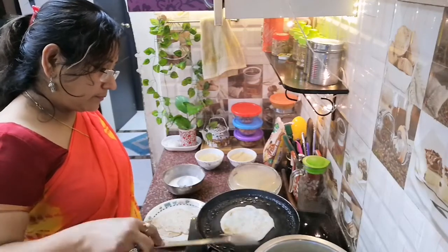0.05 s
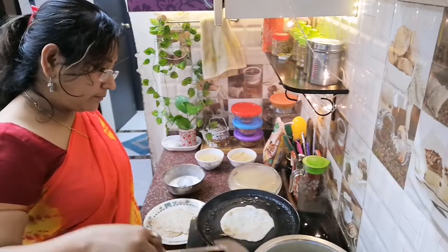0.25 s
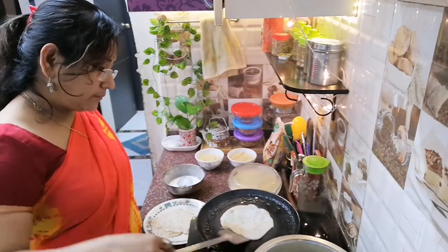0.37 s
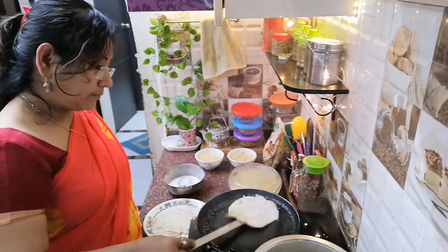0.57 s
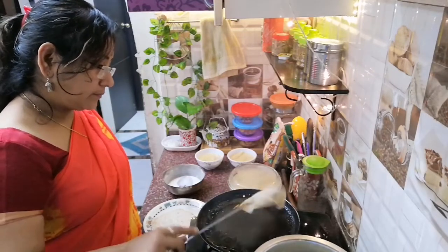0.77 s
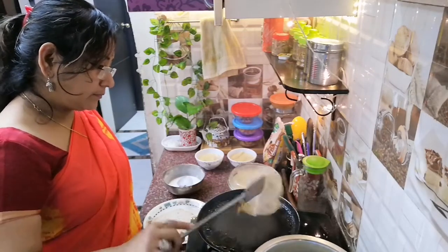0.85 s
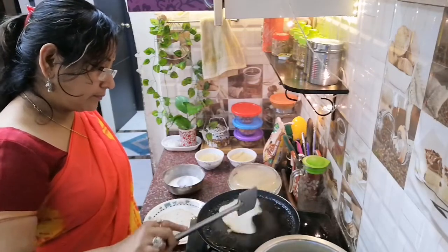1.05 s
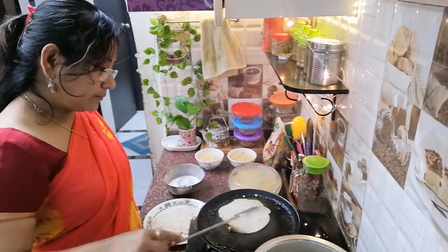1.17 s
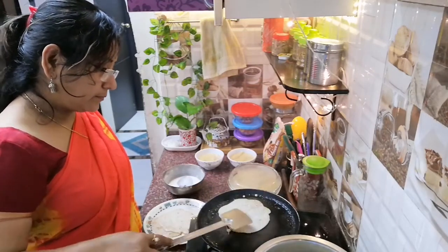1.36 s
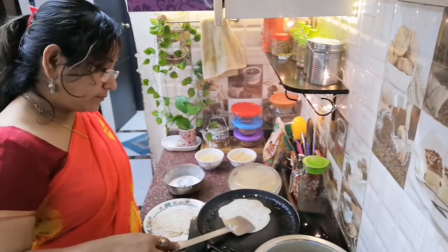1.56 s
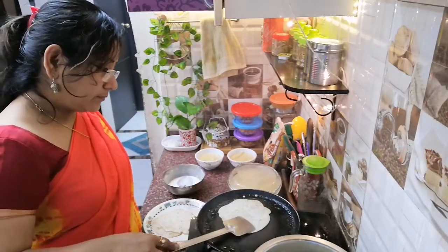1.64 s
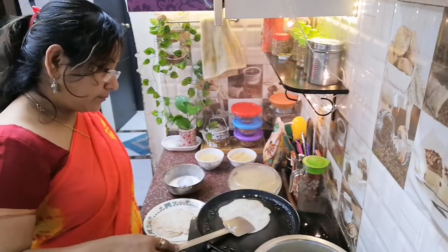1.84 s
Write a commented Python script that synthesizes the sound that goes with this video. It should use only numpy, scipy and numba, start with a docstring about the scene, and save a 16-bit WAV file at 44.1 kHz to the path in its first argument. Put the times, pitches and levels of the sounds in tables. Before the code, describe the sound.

Close stereo sound of a pancake being turned in a small tiled kitchen: ringing spatula knock, squeaky scraping, a short pause, soft wet slap with spitting steam, then pressing hiss and four dull taps over low rumble.

```python
"""Turning a pancake in a pan

A spatula knocks on a pan, exciting its modes, then scrapes and squeals under a small pancake by stick-slip.
The wet side lands as a noisy slap with spits of steam; the blade presses it and pats it four times.
Batter sizzles faintly throughout as random steam pops; filtered noise gives the kitchen's low rumble.
Decaying noise echoes stand for the tiles and the short reverberation of the room."""
import sys
import numpy as np
from scipy import signal
from scipy.fft import rfft, irfft
from scipy.io import wavfile
from numba import njit

SR = 44100
rng = np.random.default_rng(int(sys.argv[2]) if len(sys.argv) > 2 else 0)


def dump_mix(stems):
    """Bounce the given channels to the path in sys.argv[1] as a 16-bit WAV at rate SR."""
    frames = np.atleast_2d(stems).T  # one column per channel
    limited = np.clip(frames, -1, 1)  # hard clip at full scale
    pcm = np.round(limited * 32767).astype(np.int16)
    wavfile.write(sys.argv[1], SR, pcm)


N = 85995

# Levels are relative within each source.
# background noise spectrum: f/Hz, level/dB
RUMBLE_SPECTRUM = [(15, -47), (30, -18), (48, 4), (65, -14), (100, -6.5), (180, -13), (500, -18.5),
                   (3000, -48)]
# steam under the sliding or landing pancake, spectrum: f/Hz, level/dB
STEAM_SPECTRUM = [(250, -20), (900, -9.5), (1600, -11.5), (3100, -1), (4100, -7.5), (5300, -0.5), (6600, 3),
                  (8700, -3.5), (10000, -5), (15500, -13.5)]
# steam under the pressing blade, spectrum: f/Hz, level/dB
PRESSED_SPECTRUM = [(250, -18), (1050, -6.5), (1500, -11.5), (2200, -0.5), (3200, 0), (4200, -15.5),
                    (5200, 2), (6400, 0), (7400, -7), (15500, -15.5)]
# batter left to itself, spectrum: f/Hz, level/dB
IDLE_SPECTRUM = [(300, -1), (1500, -9), (3000, -2.5), (4100, -7.5), (5500, 0.5), (7900, 1), (10000, -5.5),
                 (15500, -12)]
# hiss as the pancake peels and slides off the pan: t/s, level/dB
PEEL_LEVEL = [(.25, -71), (.27, -37.5), (.34, -45.5), (.436, -48.5), (.478, -45), (.53, -51), (.562, -45.5),
              (.578, -38.5), (.644, -40), (.664, -38.5), (.7, -43), (.76, -82)]
# spits of steam under the pancake: start/s, attack/s, hold/s, decay/(dB/s), level/dB
STEAM_SPITS = [(1.038, 0.039, .008, 130, -42), (1.106, 0.026, 0.0051, 138, -49),
               (1.206, 0.034, 0.0069, 186, -53.5)]
# hiss under the pressing blade: t/s, level/dB
PRESS_LEVEL = [(1.53, -65), (1.595, -46), (1.66, -48), (1.8, -49.5), (1.835, -57), (1.87, -50.5),
               (1.96, -64.5)]
# blade meets pan: t/s, level/dB, contact smoothing time constant/s, blade ping level/dB
KNOCKS = [(0.2437, -1.5, 0.000028, -2), (0.2487, -1, 0.000004, -14), (0.2511, 1.5, 0.00002, -14.5),
          (0.2533, -4, 0.000012, -27)]
# vibration modes of the pan: f/Hz, level/dB, T60/s
PAN_MODES = [(275, -14, 0.17), (374.1, -10.5, 0.11), (454.7, -8, 0.12), (620, -3, 0.24), (655, -6, 0.11),
             (843, -9, 0.13), (2105, -22, 0.28), (3548, -2.5, 0.12), (3636, 4.5, 0.05), (5100, -3.5, 0.1),
             (5654, -4, 0.25), (5760, -10, 0.16), (6480, -6, 0.063), (8330, 1, 0.048), (8530, -19, 0.064),
             (8720, -9.5, 0.29)]
# contact noise of a knock, spectrum: f/Hz, level/dB
CRACK_SPECTRUM = [(130, -56), (300, 0), (700, -7), (1200, -15.5), (2000, -10), (4200, -8), (6000, 5.5),
                  (7600, -2), (8500, 0.5), (10000, -5), (15500, -13)]
# friction of the blade on the pan: t/s, level/dB
SCRAPE_LEVEL = [(.26, -42), (.33, -51.5), (.436, -42), (.48, -41), (.6, -54.5), (.665, -49), (.73, -82)]
# resonances of blade and pan under load: f/Hz, width of one filter pass/Hz, level/dB
BLADE_RESONANCES = [(1030, 370, -13.5), (1610, 1100, -9), (2280, 390, -8), (2633, 230, 0.5), (3347, 600, 0),
                    (5580, 1800, -6)]
# pan ringing kept up by the dragging blade: attack/s, hold/s, decay/(dB/s), level/dB
DRAG_SWELL = (0.0949, 0.0333, 76, -46)
# squeal of the blade edge: t/s, pitch/Hz, level/dB
SQUEAL_TRACK = [(0.321, 2084, -61), (.36, 2154, -53), (.4, 2234, -45), (.42, 2059, -46),
                (.445, 2047, -44.5), (0.469, 2063, -49.5), (0.511, 2110, -38), (0.556, 2087, -42.5),
                (0.594, 2070, -57)]
# rasping bands moving with the squeal: multiple of its pitch, width of one filter pass/Hz, level/dB
SQUEAL_BANDS = [(0.484, 330, -5), (1.06, 333, -2)]
# wet slap of the landing, spectrum: f/Hz, level/dB
SLAP_SPECTRUM = [(200, -35), (750, -0.5), (1700, -12), (3500, 4), (4200, -11), (6000, 7), (10000, -8),
                 (15000, -17)]
# blade pats the pancake: t/s, level/dB, factor on the spectrum frequencies
PATS = [(1.657, -15.5, 0.98), (1.7418, -18.5, 0.99), (1.8133, -20, 0.94), (1.8659, -22, 0.492)]
# damped thud of a pat, spectrum before the pitch factor: f/Hz, level/dB
THUD_SPECTRUM = [(130, -22.5), (330, -5.5), (520, 0.5), (1180, -1.5), (1400, -8), (2200, -7.5),
                 (14000, -41)]
# hard edge of a pat, spectrum before the pitch factor: f/Hz, level/dB
CLACK_SPECTRUM = [(250, -15), (750, -4), (1200, 9.5), (1400, -12), (2200, -5), (2700, -17), (8000, -33)]
# response of the left microphone port over the right: f/Hz, level/dB
PORT_DIFFERENCE = [(60, -1.5), (600, -5), (1200, -8), (2300, -3), (6400, -7), (7400, -4), (8600, 16),
                   (9800, -0.5), (12000, -3.5), (14500, -7.5)]

RUMBLE_DB, RUMBLE_SIDE_DB = -58, -8
IDLE_DB, POPS_PER_S, POP_SPREAD_DB = -61, 5000, 2.5
SPUTTER_HZ, SPUTTER_DB = 128, 2  # uneven steam
RING_DB, CRACK_T60_S = -30.5, 0.074
PING_HZ, PING_T60_S, PING_DB = 2633, 0.027, -19.5  # the stiff blade's own brief note
UNEVENNESS, UNEVENNESS_HZ = 0.52, 59.9  # depth and rate of random unevenness in each ringing tone
SLIPS_PER_S, SLIP_SPREAD_DB = 2500, 1.5
CATCH_HZ, CATCH_DB = 79.6, 2.5  # uneven friction
DRAG_WIDTH_HZ, DRAG_WIDTH_SHARE = 117, 0.023  # contact widens each mode
SQUEAL_TONE_DB = 3
LANDING_S, LANDING_DB, SLAP_T60_S = 1.077, -9, 0.2
SMACK_DB, SMACK_T60_S = -4.5, 0.02  # first touch of the wet side
PAT_T60_S, CLACK_T60_S, CLACK_DB = 0.21, 0.04, -4
WALL_T60_S, WALL_DB, ROOM_T60_S, ROOM_DB = 0.032, -4.5, 0.42, -10.5
SIDE_DB, SIDE_FROM_HZ = -1.5, 750  # bass is kept equal on both sides
PORT_LAG_S, TOP_HZ = 0.00006, 15650
GAIN_THRESHOLD_DB, GAIN_RATIO, GAIN_ATTACK_S, GAIN_RELEASE_S = -46.5, 1.363, 0.011, 0.21


def undb(db):
    """Decibel definition: amplitude gain is ten to the power of level over twenty."""
    return 10 ** (np.asarray(db) / 20)


def unit(x):
    """Power normalisation: scale to an rms of 1."""
    return x / np.sqrt(np.mean(x ** 2))


def gains(points, size):
    """Log-frequency interpolation: a spectrum in dB on the bins of a transform."""
    hz, db = np.array(points).T
    bins_hz = np.arange(size // 2 + 1) * SR / size
    return np.interp(np.log(bins_hz + 1), np.log(hz), db)  # +1 avoids log(0)


def colour(x, points, size=4096):
    """Minimum-phase filtering: the folded cepstrum gives a causal response of unit energy."""
    cepstrum = irfft(np.log(undb(gains(points, size))))
    cepstrum[1:size // 2] *= 2
    cepstrum[size // 2 + 1:] = 0
    response = irfft(np.exp(rfft(cepstrum)))
    return signal.fftconvolve(x, response / np.linalg.norm(response))[:N]


def fade(start, t60):
    """Exponential damping: amplitude falls by 60 dB in each T60 from the start on."""
    age = np.arange(N) / SR - start
    return (age >= 0) * np.exp(-np.log(1000) * np.maximum(age, 0) / t60)


def burst(start, t60):
    """Damped random excitation: decaying noise of unit energy."""
    x = rng.standard_normal(N) * fade(start, t60)
    return x / np.linalg.norm(x)


def grains(rate, spread_db):
    """Random impulse process: tiny clicks of uneven size and either sign, rms 1."""
    size = undb(spread_db * np.minimum(rng.exponential(size=N), 5))
    happens = rng.random(N) < rate / SR
    return unit(happens * size * np.sign(rng.standard_normal(N)))


def curve(t, points):
    """Piecewise envelope: gain linear in dB between points, silent outside them."""
    s, db = np.array(points).T
    return undb(np.interp(t, s, db)) * (t > s[0]) * (t < s[-1])


def swell(t, start, attack, hold, fall, db):
    """Build-up and damping: a gathering attack, a hold and a steady decay in dB per second."""
    rise = np.clip((t - start) / attack, 0, 1) ** 2
    return rise * undb(db - fall * np.maximum(t - start - attack - hold, 0))


def wobble(t, rate):
    """Slow random modulation: random values, so many a second, joined by straight lines."""
    knots = np.arange(1024) / rate
    return np.interp(t, knots, rng.standard_normal(len(knots)))


def mode(t, hz):
    """Modulated vibration: a tone of random starting phase with unsteady size and phase."""
    size = UNEVENNESS * wobble(t, UNEVENNESS_HZ)
    skew = UNEVENNESS * wobble(t, UNEVENNESS_HZ)
    phase = 2 * np.pi * (hz * t + rng.random())
    return ((1 + size) * np.sin(phase) + skew * np.cos(phase)) / np.sqrt(1 + 2 * UNEVENNESS ** 2)


def resonate(x, hz, width):
    """Resonance: two passes of one peak filter give it steep skirts."""
    b, a = signal.iirpeak(hz, hz / width, fs=SR)
    return signal.lfilter(b, a, signal.lfilter(b, a, x))


def rumble():
    """Diffuse background noise: a strong common part and a weaker part of opposite sign on the two sides."""
    mid, side = (unit(colour(rng.standard_normal(N), RUMBLE_SPECTRUM)) for _ in range(2))
    return undb(RUMBLE_DB) * (mid + undb(RUMBLE_SIDE_DB) * np.array([side, -side]))


def sizzle(t):
    """Vapour bursting: tiny pops, faint at rest, stronger as the batter slides, lands and is pressed."""
    def pops(spectrum):
        return colour(grains(POPS_PER_S, POP_SPREAD_DB), spectrum)

    steam_level = curve(t, PEEL_LEVEL) + sum(swell(t, *spit) for spit in STEAM_SPITS)
    steam = pops(STEAM_SPECTRUM) * steam_level
    pressed = pops(PRESSED_SPECTRUM) * curve(t, PRESS_LEVEL)
    sputter = undb(SPUTTER_DB * wobble(t, SPUTTER_HZ))
    return (steam + pressed) * sputter + pops(IDLE_SPECTRUM) * undb(IDLE_DB)


def knock(t):
    """Impact excitation: each contact of the chattering blade cracks, pings and feeds the pan's modes."""
    tones = [undb(db) * mode(t, hz) for hz, db, _ in PAN_MODES]
    out = 0
    for s, db, soft, ping_db in KNOCKS:
        ring = sum(tone * fade(s, t60) for tone, (_, _, t60) in zip(tones, PAN_MODES))
        ring = ring / np.sqrt(len(KNOCKS))
        crack = colour(burst(s, CRACK_T60_S), CRACK_SPECTRUM)
        ping = undb(PING_DB + ping_db) * mode(t, PING_HZ) * fade(s, PING_T60_S)
        hit = undb(RING_DB) * ring + crack + ping
        keep = np.exp(-1 / (soft * SR))  # a softer contact dulls the treble
        out = out + undb(db) * signal.lfilter([1 - keep], [1, -keep], hit)
    return out


def scrape(t):
    """Stick-slip friction: slips excite blade resonances and squeal; rubbing sustains the pan's long modes."""
    def rub(hz, width):
        return resonate(grains(SLIPS_PER_S, SLIP_SPREAD_DB), hz, width)

    body = sum(undb(db) * rub(hz, width) for hz, width, db in BLADE_RESONANCES)
    ring = 0
    for hz, db, t60 in PAN_MODES:
        loaded_mode = unit(rub(hz, DRAG_WIDTH_HZ + DRAG_WIDTH_SHARE * hz))
        ring = ring + undb(db) * t60 ** 2 * loaded_mode  # favours long modes
    catches = undb(CATCH_DB * wobble(t, CATCH_HZ))
    friction = unit(body) * curve(t, SCRAPE_LEVEL) * catches
    last_knock_s = KNOCKS[-1][0]
    return friction + unit(ring) * swell(t, last_knock_s, *DRAG_SWELL) + squeal(t)


def squeal(t):
    """Self-excited edge vibration: a shaky tone and rasping bands, whose pitch shifts with the load."""
    s, hz, db = np.array(SQUEAL_TRACK).T
    centre = hz.mean()
    turns = np.cumsum(np.interp(t, s, hz)) / SR
    bend = 2 * np.pi * (turns - centre * t)  # phase gained over a steady tone
    out = undb(SQUEAL_TONE_DB) * mode(turns / centre, centre)
    for multiple, width, band_db in SQUEAL_BANDS:
        rasp = unit(resonate(grains(SLIPS_PER_S, SLIP_SPREAD_DB), multiple * centre, width))
        shifted = np.real(signal.hilbert(rasp) * np.exp(1j * multiple * bend))
        out = out + undb(band_db) * shifted
    return out * curve(t, list(zip(s, db)))


def landing():
    """Damped wet impact: a brief smack of first touch upon a longer soft slap."""
    smack = undb(SMACK_DB) * burst(LANDING_S, SMACK_T60_S)
    return undb(LANDING_DB) * colour(burst(LANDING_S, SLAP_T60_S) + smack, SLAP_SPECTRUM)


def pats():
    """Damped impact of the blade: each pat is a thud with a short hard edge, both scaled in pitch."""
    def blow(s, t60, spectrum, pitch):
        return colour(burst(s, t60), [(hz * pitch, db) for hz, db in spectrum])

    out = 0
    for s, db, pitch in PATS:
        thud = blow(s, PAT_T60_S, THUD_SPECTRUM, pitch)
        clack = undb(CLACK_DB) * blow(s, CLACK_T60_S, CLACK_SPECTRUM, pitch)
        out = out + undb(db) * (thud + clack)
    return out


def kitchen(pair):
    """Reverberation: close reflections from the tiles and a short tail, different on each side."""
    def echo():
        return undb(WALL_DB) * burst(0.0006, WALL_T60_S) + undb(ROOM_DB) * burst(0.0098, ROOM_T60_S)

    return np.array([x + signal.fftconvolve(x, echo())[:N] for x in pair])


def scene():
    """Superposition: all sources add; above the bass the stove sounds partly unlike on the two sides."""
    t = np.arange(N) / SR
    mid, side = (sizzle(t) + knock(t) + scrape(t) + landing() + pats() for _ in range(2))
    high_pass = signal.butter(2, SIDE_FROM_HZ, "high", fs=SR, output="sos")
    side = undb(SIDE_DB) * signal.sosfilt(high_pass, side)
    stove = undb(0.5) * (mid + np.array([side, -side]))
    return kitchen(stove) + rumble()


@njit
def follow(x, attack, release):
    """Envelope detection: a level follower, quick up and slow down."""
    out, level = np.empty(len(x)), 0.
    for i in range(len(x)):
        level += (x[i] - level) * (attack if x[i] > level else release)
        out[i] = level
    return out


def record(dry):
    """Transduction: ports differ in response and delay; gain falls with level; the top is cut."""
    tilt = gains(PORT_DIFFERENCE, 2 * N) / 2  # half the difference to each side
    lag = np.exp(-1j * np.pi * np.arange(N + 1) * SR / N * PORT_LAG_S)  # right side later
    ports = np.array([undb(tilt), undb(-tilt) * lag])
    heard = irfft(rfft(dry, 2 * N) * ports)[:, :N]
    loudness = np.abs(heard).mean(axis=0)
    level = follow(loudness, 1 / (GAIN_ATTACK_S * SR), 1 / (GAIN_RELEASE_S * SR))
    excess = np.maximum(level / undb(GAIN_THRESHOLD_DB), 1)
    heard = heard * excess ** (1 / GAIN_RATIO - 1)
    low_pass = signal.ellip(10, .2, 80, TOP_HZ, fs=SR, output="sos")
    return signal.sosfilt(low_pass, heard)


dry = scene()
out = record(dry)
dump_mix(out)
```